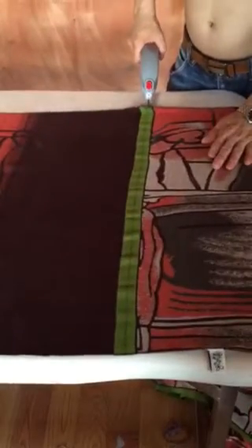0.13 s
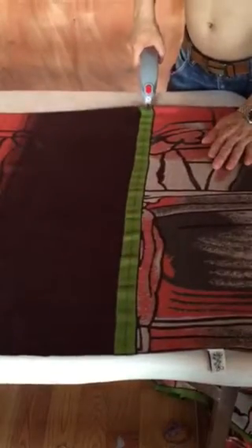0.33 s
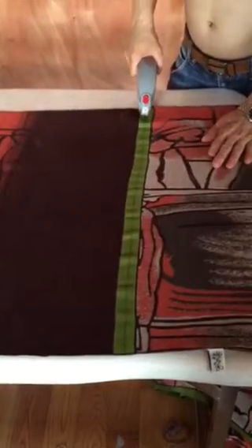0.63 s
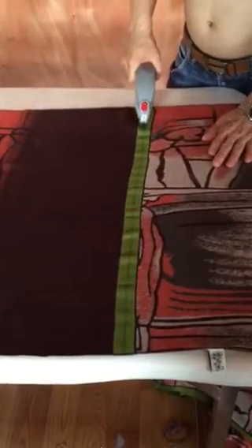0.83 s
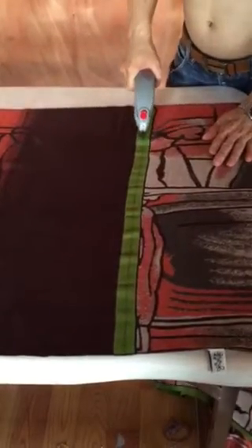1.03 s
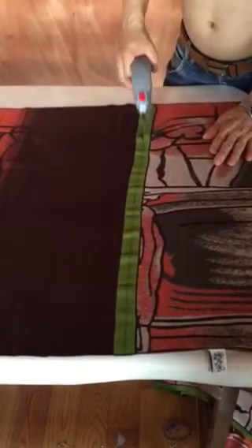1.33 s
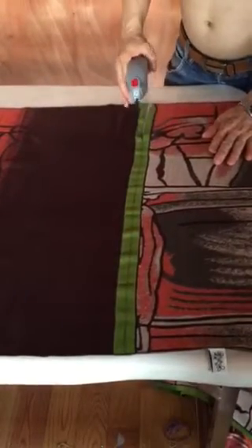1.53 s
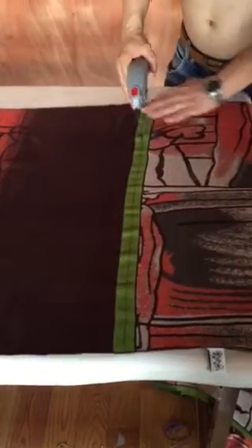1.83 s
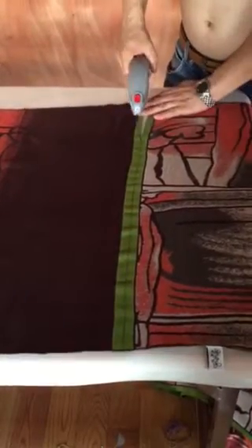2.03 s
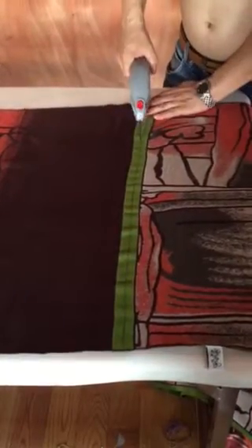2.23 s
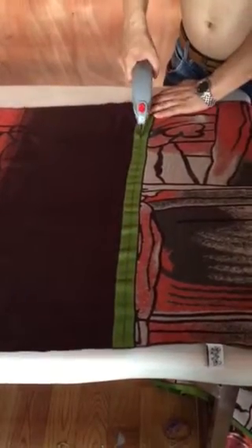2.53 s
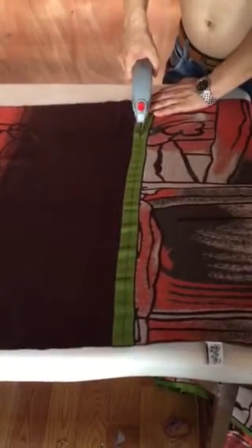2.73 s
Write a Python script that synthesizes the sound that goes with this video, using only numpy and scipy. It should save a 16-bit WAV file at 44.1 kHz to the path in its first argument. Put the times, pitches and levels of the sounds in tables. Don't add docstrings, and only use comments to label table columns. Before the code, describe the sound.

Harsh rattling buzz of an electric fabric cutter, slowing to silence, then briefly restarting up close

```python
import sys
import numpy as np
from scipy import signal
from scipy.fft import rfft, irfft, next_fast_len
from scipy.io import wavfile
from scipy.ndimage import map_coordinates

SR = 44100
rng = np.random.default_rng(int(sys.argv[2]) if len(sys.argv) > 2 else 0)


def generate_wav(signal):
    frames = np.transpose(np.atleast_2d(signal))
    scaled = np.clip(frames, -1, 1) * 32767
    pcm = np.round(scaled).astype(np.int16)
    wavfile.write(sys.argv[1], SR, pcm)


def gain_from_db(level_db):
    decades = np.asarray(level_db, float) / 20
    return 10 ** decades


N = 127890
T = np.arange(N) / SR

# time_s, speed_turns_per_s
CRANK_SPEED = [(0, 64.92), (.08, 55.5), (.155, 41.98), (.21, 60.25), (.28, 69.68), (.39, 73.32),
               (.6, 74.01), (.9, 74.25), (1.245, 74.28), (1.33, 57.05), (1.45, 41.53), (1.58, 25.12),
               (1.7, 13.7), (1.82, 0), (2.792, 0), (2.865, 30.5), (2.9, 49)]
# time_s, bite_share, gear_tone_load_db, panel_looseness_db, drive_play_db
CONTACT = [(0, 0.36, -40, -1.5, 1.5), (.07, 0.2, -40, -11, -1.5), (.11, 0.5, -40, -11, -0.5),
           (.2, 0.2, -40, -7.5, -1.5), (.33, 0.8, -10, -23, 0), (.39, 0.76, 3, -6, -0.5),
           (.6, 1.1, -0.5, -27, 1), (.9, 1, -0.5, -26, -0.5), (1.24, 0.99, 2, -26, 0),
           (1.3, 0.7, -1, -14, -0.5), (1.4, .1, -11, -12, -0.5), (1.5, 0.7, -30, -10, 1.5),
           (1.62, 0.7, -40, -5.5, -1), (1.8, 0, -45, -14, -3), (2.822, .1, -40, -14, -14),
           (2.832, 0, -40, -12, -6), (2.858, 0, -40, -3.5, 0), (2.9, 0, -30, -5, -0.5)]
# centre_hz, width_hz, level_db
HOUSING_MODES = [(2600, 290, -2.5), (3390, 690, -1.5), (3855, 470, 2), (4630, 240, -2), (6350, 900, -6.5),
                 (9100, 360, -6), (11900, 880, -3.5)]
# centre_hz, width_hz, level_db
PANEL_MODES = [(945, 30, 4), (1150, 120, -3), (2480, 250, -2)]
# frequency_hz, density_db_per_hz
RATTLE_COLOUR = [(300, -13), (1200, -9), (2600, -4.5), (4200, 0.5), (6500, -2), (7800, -8.5), (9300, -7),
                 (15000, -19.5)]
# frequency_hz, density_db_per_hz
GEAR_COLOUR = [(300, -30), (900, 1), (2000, 6), (2650, 4), (4600, -1.5), (6600, 0.5), (7600, -2.5),
               (15000, -0.5)]
# centre_hz, width_hz, level_db
GEAR_MODES = [(2680, 400, 1.5), (3930, 250, 7.5), (4660, 270, 10), (6650, 250, -2), (9060, 360, 4)]
# crank_multiple, rms_db
GEAR_TONES = [(5, -57), (10, -58), (11, -59), (12, -46), (13, -56), (15, -51), (16, -54), (23, -58),
              (27, -56), (32, -54), (33, -52), (35, -51), (36, -50), (38, -52)]
# start_s, level_db
FOOT_BUMPS = [
    (0.346, -35),
    (0.452, -32.5),
    (0.509, -38),
    (0.591, -28),
]
# centre_s, level_db
BAND_RATTLES = [(1.92, -76), (1.945, -72), (2.022, -72), (2.124, -70), (2.208, -60), (2.245, -65),
                (2.29, -55), (2.31, -65), (2.342, -62), (2.362, -76), (2.4, -73)]
# frequency_hz, density_db_per_hz
LINK_RUSTLE = [(1000, -20), (2500, -7), (5500, 9), (7500, -24), (12000, -6), (15000, -12)]
# time_s, first_tone_db, second_tone_db
HUM_LEVELS = [(0.0, -42, -48), (0.05, -61.5, -45), (0.25, -47, -53.5), (0.35, -55, -50), (0.42, -50, -48.5),
              (0.85, -50, -44.5), (1.0, -64, -76), (1.03, -49, -51), (1.25, -56, -66), (1.32, -51, -43.5),
              (1.62, -43, -56), (1.99, -44.5, -42), (2.24, -59, -44), (2.29, -59, -47), (2.56, -45, -50),
              (2.64, -45, -71), (2.73, -41, -49), (2.9, -48, -49)]
# first_hz, second_hz
HUM_PITCHES = (49.4, 99.8)
# frequency_hz, density_db_per_hz
ROOM_COLOUR = [(30, -11.5), (120, 0), (256, -3), (450, -14), (1500, -16), (2700, -21), (4500, -32),
               (15500, -54)]
# frequency_hz, t60_s
ROOM_DECAY = [(300, 0.96), (3000, 0.5), (12000, 0.14)]


def unit(x):
    return x / np.sqrt(np.mean(x ** 2) + 1e-20)


def along(points, hz):
    f, v = np.transpose(points)
    return np.interp(np.log(hz + 1), np.log(f + 1), v)


def curves(rows):
    s, *columns = np.transpose(rows)
    return [np.interp(T, s, column) for column in columns]


def wobble(knots_per_s):
    knots = rng.standard_normal(int(N * 200 / SR) + 4)
    return map_coordinates(knots, [T * knots_per_s])


def filtered(x, response):
    m = next_fast_len(N + SR // 2)
    hz = np.fft.rfftfreq(m, 1 / SR)
    return irfft(rfft(x, m) * response(hz), m)[:N]


def noise(spectrum):
    points = [(15, -90)] + list(spectrum)
    return unit(filtered(rng.standard_normal(N), lambda hz: gain_from_db(along(points, hz))))


def resonances(modes):
    def response(f):
        total = 0
        for k, (centre, width, db) in enumerate(modes):
            damping = 1j * f * width
            total = total + (-1) ** k * gain_from_db(db) * damping / (centre * centre - f * f + damping)
        return total
    return response


def crank_blows(turns, speed_db, bite, play_db):
    cut_stroke_db, return_stroke_db = 2.5, -6
    knock_grows, rattle_grows = 0.39, 0.14
    jitter_s, scatter_db, lead_s = .00005, 1.1, .0006
    at = np.flatnonzero(np.diff(np.floor(2 * turns)))
    chance = rng.standard_normal((len(at), 3))
    cutting = np.floor(2 * turns[at + 1]) % 2
    stroke_db = np.where(cutting, cut_stroke_db, return_stroke_db) * bite[at]
    force_db = stroke_db + knock_grows * speed_db[at] + play_db[at]
    shift = np.round(SR * (jitter_s * chance[:, 0] - lead_s)).astype(int)
    knocks, shakes = np.zeros(N), np.zeros(N)
    knocks[np.clip(at + shift, 0, N - 1)] = gain_from_db(force_db + scatter_db * chance[:, 1])
    shakes[at] = gain_from_db(force_db + rattle_grows * speed_db[at] + scatter_db * chance[:, 2])
    return knocks, shakes


def housing_ring(knocks):
    touch_s, touch_share, blow_hz = .00065, .35, 7300

    def response(f):
        blow = 1 / (1 + 1j * f / blow_hz) ** 2
        touch = 1 + touch_share * np.exp(2j * np.pi * f * touch_s)
        return resonances(HOUSING_MODES)(f) * blow * touch
    return gain_from_db(3) * filtered(knocks, response)


def panel_ring(knocks, loose_db):
    return gain_from_db(7) * filtered(knocks * gain_from_db(loose_db), resonances(PANEL_MODES))


def parts_rattle(shakes):
    t60_s, rise_s = 0.02, 0.00067
    t = T[:SR // 10]
    burst = gain_from_db(-60 * t / t60_s) * (1 - np.exp(-t / rise_s))
    return gain_from_db(-27) * signal.fftconvolve(shakes, burst)[:N] * noise(RATTLE_COLOUR)


def gear_hiss(speed_db, bite, play_db):
    gear_db, grows_db_per_db, bite_db = -37, 1.2, -1
    hiss = unit(filtered(noise(GEAR_COLOUR), lambda f: 1 + np.abs(resonances(GEAR_MODES)(f))))
    level_db = gear_db + np.minimum(play_db, 0) + grows_db_per_db * speed_db + bite_db * bite
    unsteady_db = 1.8 * wobble(150) + 0.35 * wobble(12.5)
    return gain_from_db(level_db + unsteady_db) * hiss


def cutter():
    start_turn, full_speed = .133, 74
    speed, = curves(CRANK_SPEED)
    bite, _, loose_db, play_db = curves(CONTACT)
    turns = start_turn + np.cumsum(speed) / SR
    speed_db = 20 * np.log10(speed / full_speed + 1e-4)
    knocks, shakes = crank_blows(turns, speed_db, bite, play_db)
    struck = housing_ring(knocks) + panel_ring(knocks, loose_db)
    return struck + parts_rattle(shakes) + gear_hiss(speed_db, bite, play_db)


def whine():
    mesh_order = 12
    bite, load_db, *_ = curves(CONTACT)
    turns = np.cumsum(curves(CRANK_SPEED)[0]) / SR
    tones = np.zeros(N)
    for order, db in GEAR_TONES:
        level = gain_from_db(db + 2.5 * wobble(7) + 1.5 * wobble(30))
        share = 1 if order == mesh_order else bite ** 2
        phase = 2 * np.pi * (order * turns + rng.random()) + .015 * order * wobble(22)
        tones += level * share * np.sin(phase)
    return np.sqrt(2) * gain_from_db(load_db) * tones


def bumps():
    pitch_hz, t60_s, rise_s = 73.5, 0.16, .006
    total = np.zeros(N)
    for start_s, db in FOOT_BUMPS:
        age = np.clip(T - start_s, 0, None)
        level = gain_from_db(db - 60 * age / t60_s) * (1 - np.exp(-age / rise_s))
        total += level * np.sin(2 * np.pi * pitch_hz * age)
    return total


def wristband():
    centre_hz, width_hz, swell_s, rustle_db = 9420, 230, 0.011, -7
    swell = sum(gain_from_db(db) * np.exp(-.5 * ((T - s) / swell_s) ** 2) for s, db in BAND_RATTLES)
    ring = filtered(rng.standard_normal(N), lambda hz: np.exp(-.5 * ((hz - centre_hz) / width_hz * 2) ** 2))
    return swell * (unit(ring) + gain_from_db(rustle_db) * noise(LINK_RUSTLE))


def room(x):
    hz, t, z = signal.stft(rng.standard_normal(SR // 2), SR, nperseg=256)
    decay = gain_from_db(-60 * t / along(ROOM_DECAY, hz)[:, None])
    tail = signal.istft(z * decay, SR, nperseg=256)[1]
    delayed = np.pad(x, (130, 0))
    return signal.fftconvolve(delayed, tail / np.linalg.norm(tail))[:N]


def background():
    hum = np.zeros(N)
    for hz, db in zip(HUM_PITCHES, curves(HUM_LEVELS)):
        hum += np.sqrt(2) * gain_from_db(db) * np.sin(2 * np.pi * hz * T + 1.5 * wobble(2.73))
    return hum + gain_from_db(-43 + 0.83 * wobble(7.33)) * noise(ROOM_COLOUR)


def scene():
    tool = cutter()
    reverberant = gain_from_db(-4) * room(tool)
    return (tool + reverberant + whine() + bumps() + wristband() + background())[None]


def low_pass(x):
    return signal.sosfilt(signal.butter(12, 15690, fs=SR, output="sos"), x)


def record(dry):
    top_hz = 15330
    mix = filtered(dry[0], lambda hz: hz < top_hz)[None]
    return low_pass(mix)


dry = scene()
out = record(dry)
generate_wav(out)
```